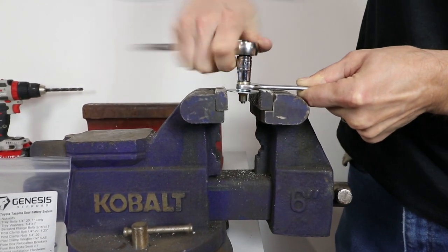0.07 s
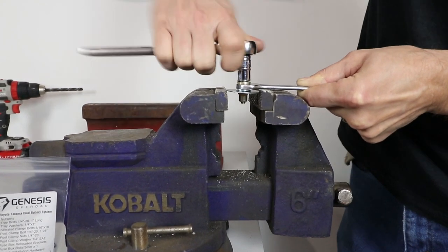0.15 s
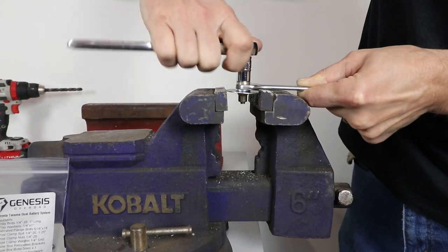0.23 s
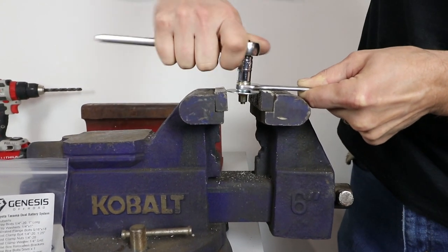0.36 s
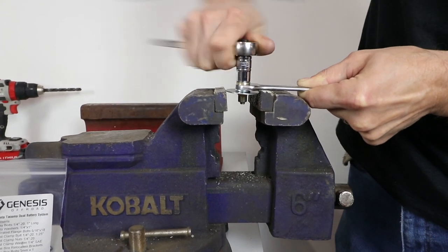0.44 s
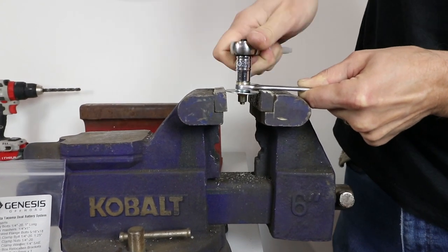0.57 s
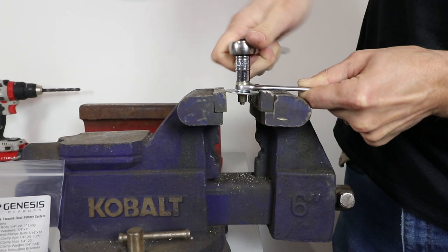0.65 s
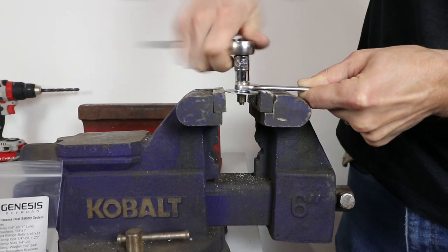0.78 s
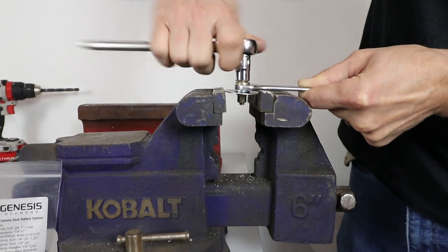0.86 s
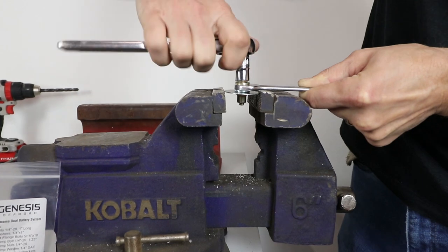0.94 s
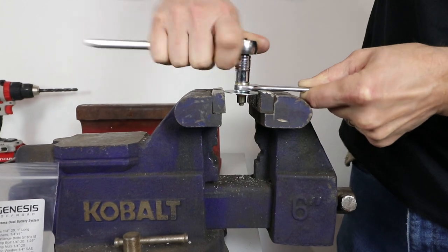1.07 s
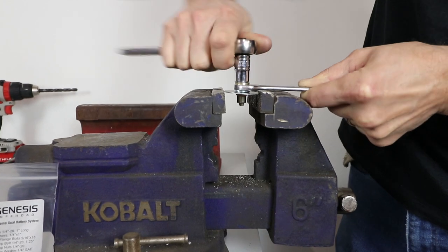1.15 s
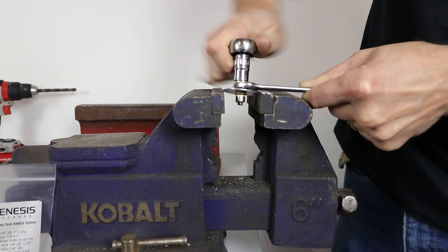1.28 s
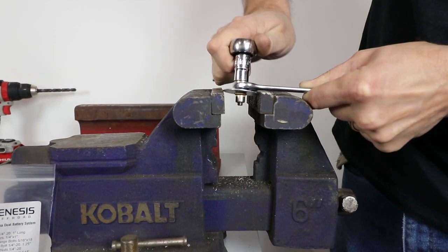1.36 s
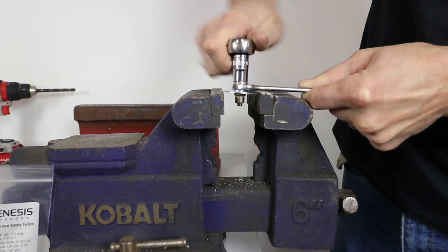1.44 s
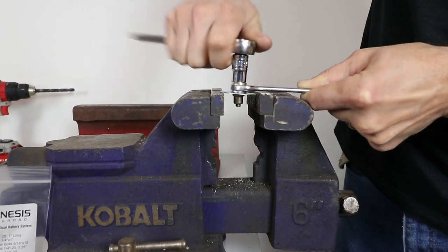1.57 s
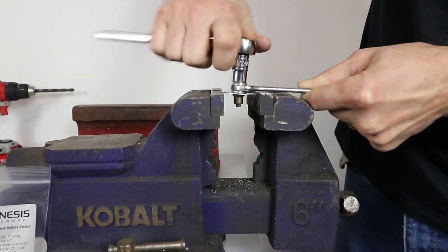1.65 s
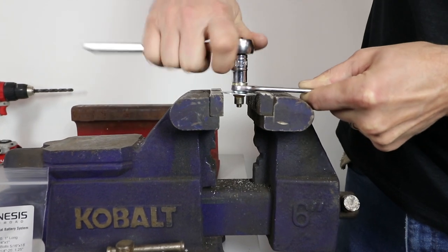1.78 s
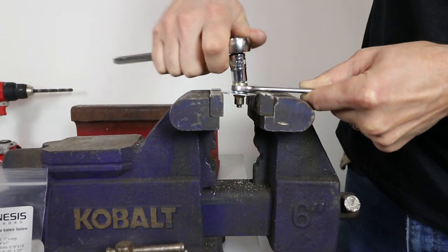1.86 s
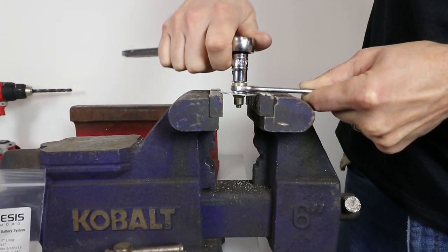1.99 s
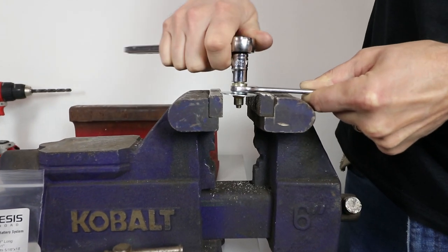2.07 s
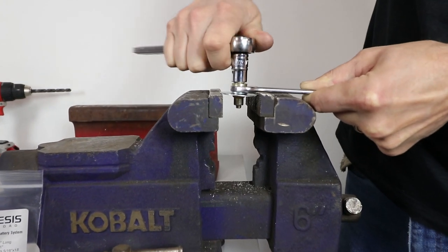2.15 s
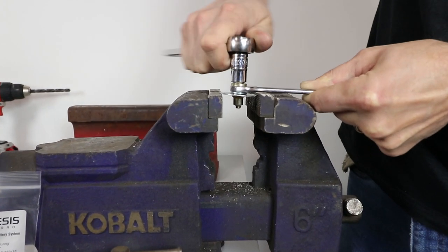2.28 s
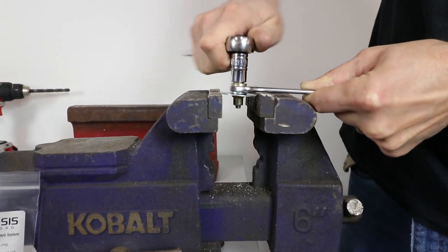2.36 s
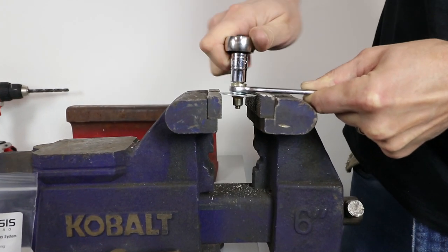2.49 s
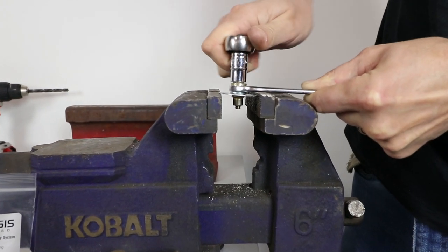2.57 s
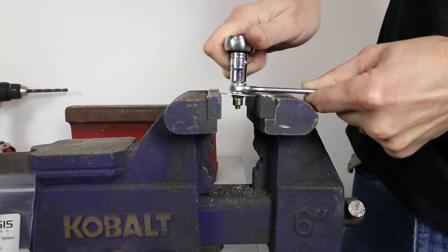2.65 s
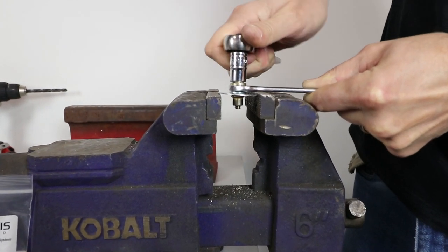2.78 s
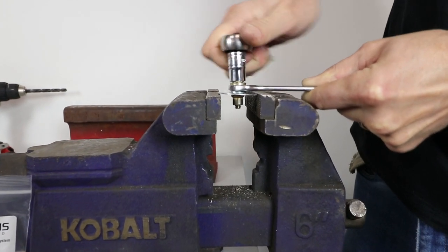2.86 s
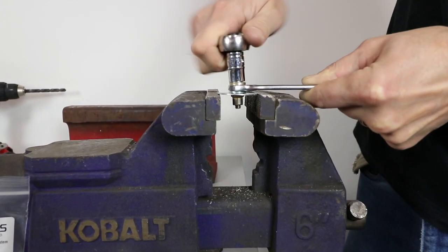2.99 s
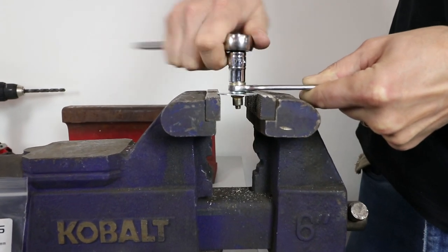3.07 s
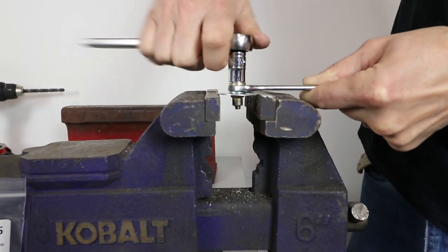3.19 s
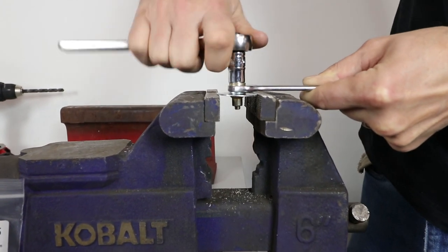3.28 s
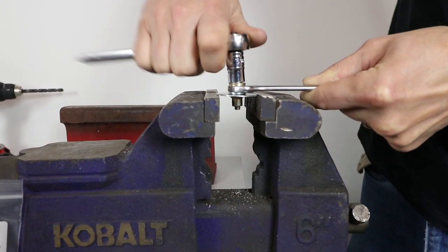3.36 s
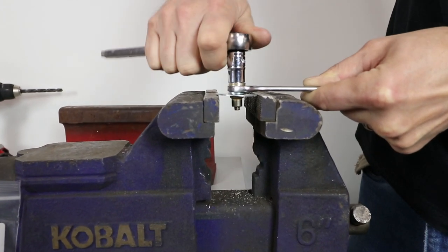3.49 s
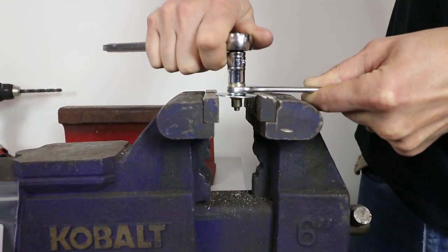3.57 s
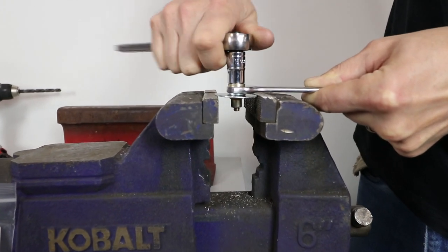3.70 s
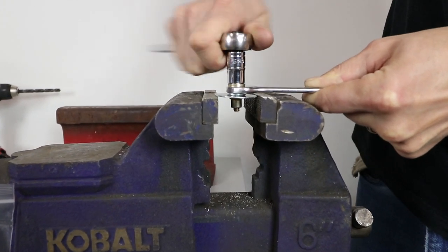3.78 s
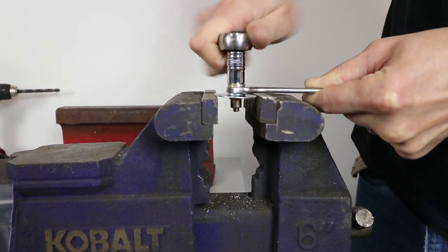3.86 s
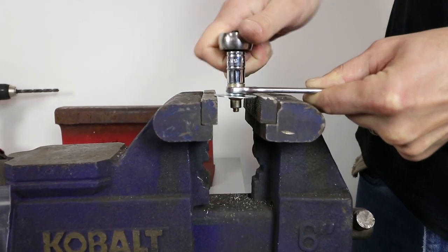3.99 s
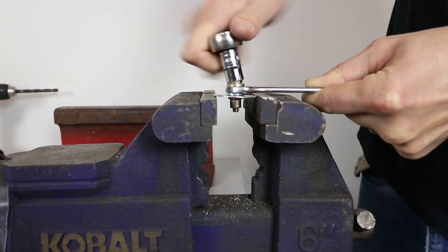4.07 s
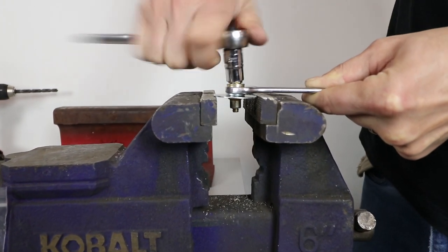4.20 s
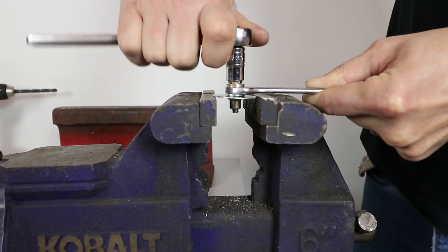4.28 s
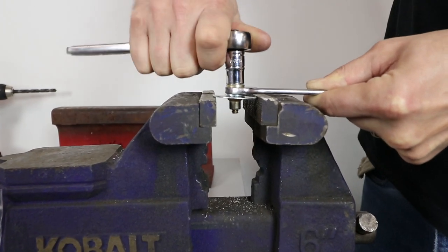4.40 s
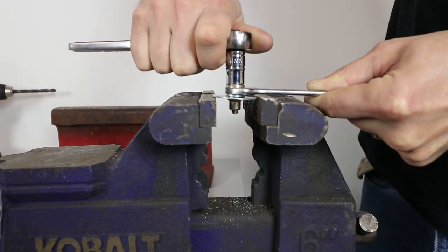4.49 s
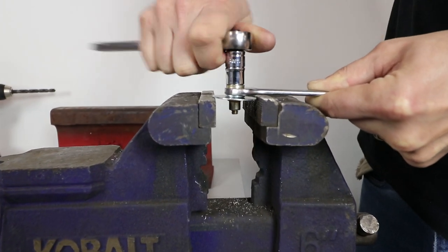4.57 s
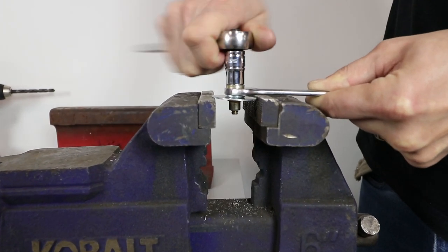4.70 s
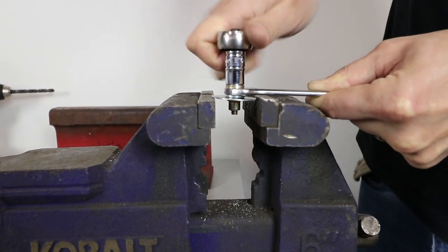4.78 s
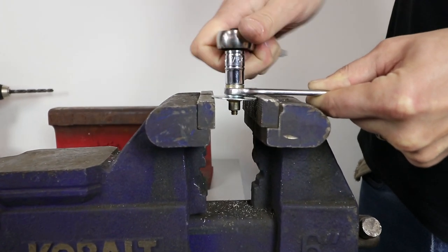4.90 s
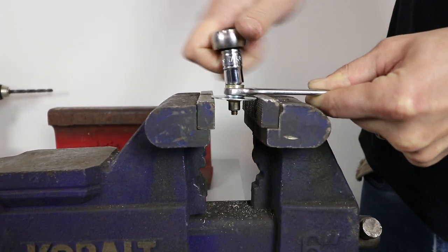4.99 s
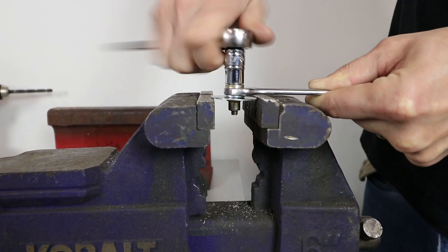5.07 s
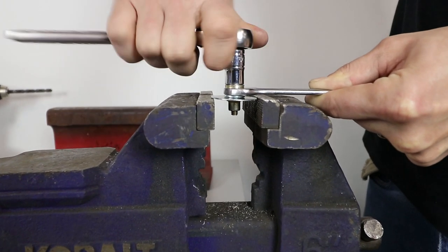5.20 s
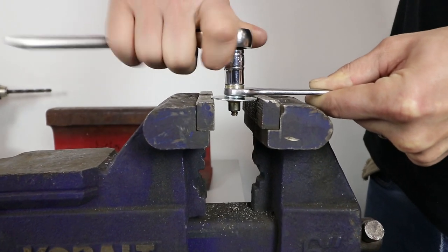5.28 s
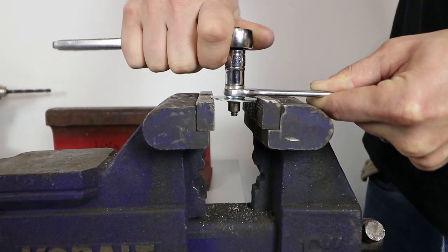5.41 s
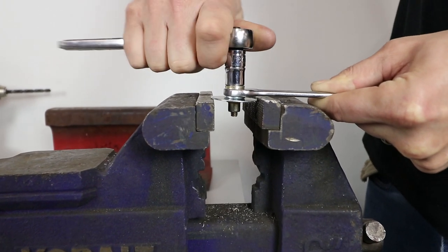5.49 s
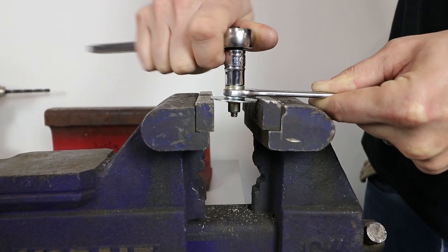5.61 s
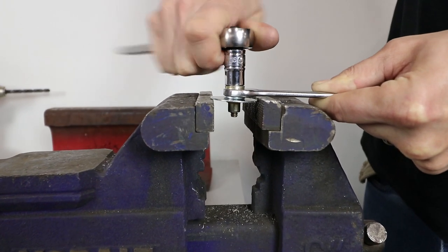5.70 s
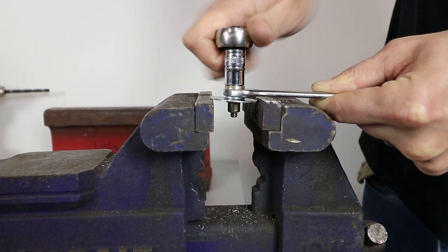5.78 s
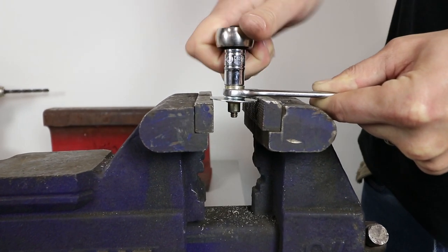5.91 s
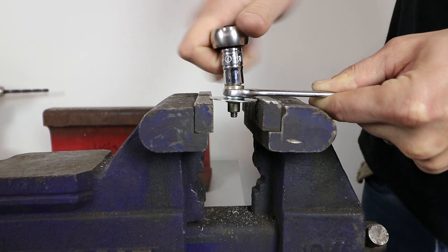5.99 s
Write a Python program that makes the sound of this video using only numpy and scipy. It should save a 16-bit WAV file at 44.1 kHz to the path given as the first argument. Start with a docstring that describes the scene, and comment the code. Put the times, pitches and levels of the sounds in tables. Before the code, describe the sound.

A socket ratchet clicks in short, close bursts while tightening a bolt in a vice, with a few metal knocks and dull thuds.

```python
"""Over the low hum of a quiet workshop, a socket ratchet clicks close to a single microphone.
It is swung to and fro on a bolt held in a bench vice. On the return the pawl snaps over the gear
teeth and sets the handle ringing; the socket knocks as play is taken up, the bench answers with
dull thuds, and the thread rubs under load. A faint treble shimmer comes and goes, a motor runs
far off, and the room gives each blow a short tail."""
import sys
import numpy as np
from scipy import signal
from scipy.fft import rfft, irfft, next_fast_len
from scipy.io import wavfile

SR = 44100
rng = np.random.default_rng(int(sys.argv[2]) if len(sys.argv) > 2 else 0)


def store_wav(level_fs):
    """Save 16-bit WAV to argv[1]."""
    pcm = np.round(np.clip(np.atleast_2d(level_fs), -1, 1) * 32767)
    wavfile.write(sys.argv[1], SR, pcm.T.astype(np.int16))


N = 266805

# The pawl landing on the teeth. Each row: start in seconds, nominal level in dB.
PAWL_CLICKS = [(.019, -49.5), (0.0312, -48), (0.048, -46.5), (.059, -31.5), (0.0705, -36), (0.074, -33),
               (0.0888, -32), (0.1038, -33), (0.12, -31), (0.1366, -32.5), (0.1534, -33), (0.1697, -35),
               (0.1874, -36), (0.215, -35), (0.193, -40), (0.241, -41), (0.3205, -48), (0.331, -43.5),
               (.746, -44.5), (0.7665, -47), (0.7757, -30.5), (0.7883, -31.5), (0.7889, -34.5),
               (0.8023, -31.5), (0.8163, -29), (0.8301, -32), (0.8437, -35), (.852, -35), (0.8592, -34.5),
               (0.8642, -33), (0.877, -37.5), (0.8944, -32), (0.9183, -30), (0.961, -31), (1.033, -42),
               (1.4773, -43.5), (1.509, -52), (1.529, -51.5), (1.5878, -29), (1.602, -48), (1.6295, -37),
               (1.6645, -31.5), (1.7021, -34), (1.8067, -46), (1.8133, -41), (1.834, -51), (1.8559, -41),
               (1.876, -49), (2.0538, -50), (2.106, -56.5), (2.9527, -46.5), (3.01, -30), (3.0491, -31.5),
               (3.0865, -34), (3.1292, -37), (3.1728, -33), (3.2147, -34), (3.2598, -33), (3.346, -55),
               (3.42, -52.5), (4.104, -48), (4.118, -45.5), (4.1524, -45), (4.1572, -35.5), (4.1769, -29.5),
               (4.1932, -31), (4.208, -31), (4.2128, -42.5), (4.2261, -28), (4.24, -28), (4.335, -53),
               (4.3653, -31), (5.031, -52), (5.037, -44.5), (5.044, -42.5), (5.063, -65), (5.0747, -31.5),
               (5.0933, -29), (5.1097, -30.5), (5.1258, -31.5), (5.142, -34), (5.159, -38), (5.1778, -39),
               (5.183, -37), (5.2012, -48), (5.242, -45.5), (5.337, -59), (5.3434, -46.5), (5.35, -45.5),
               (5.374, -41), (6.0164, -49.5), (6.029, -44)]
# The socket knocking on the bolt head as play is taken up.
# Each row: start in seconds, nominal level in dB, share of the socket and bolt modes in dB.
SLACK_KNOCKS = [(.344, -39.5, -1.5), (0.359, -45, 3.5), (1.0404, -34.5, -11), (1.284, -32, -4),
                (1.8734, -45, -2), (2.9176, -40, 2.5), (3.4033, -44.5, -9.5), (4.3681, -17, -6.5),
                (4.42, -41.5, 0), (5.322, -66, 9.5), (5.3642, -36, -12.5), (6.0365, -48.5, 5)]
# Modes of socket, bolt, head and pawl. Each row: pitch in Hz, relative level in dB, t60 in seconds.
STEEL_MODES = [(1315, -12, 0.066), (1629, -3, 0.018), (1995, -0.5, 0.018), (2660, 13.5, 0.0024),
               (3125, -7.5, 0.019), (3620, -8.5, 0.011), (4624, -8, 0.0067), (5390, 8, 0.0023),
               (5937, -2.5, 0.011), (6430, -3, 0.0071), (6915, 1.5, 0.0037), (7720, -5.5, 0.0037),
               (8940, -3.5, 0.0026), (9880, -2.5, 0.0038), (11100, -6.5, 0.0014), (12970, -27.5, 0.0026)]
# Long modes of the handle. Each row: pitch in Hz, level against a click in dB, t60 in seconds.
HANDLE_MODES = [(4965, -16, .032), (5925, -16, .035), (2310, -16, .06)]

USUAL_CLICK_DB = -35
DRAG_SAMPLES = 400   # the pawl drags this long before it lands


def from_db(db):
    """Decibels to gain."""
    return 10 ** (np.asarray(db) / 20)


def rms_one(x):
    """Scale to rms 1."""
    return x / np.sqrt(np.mean(x ** 2) + 1e-20)


def at_hz(points, hz):
    """Read a curve on a log-frequency axis."""
    point_hz, values = np.transpose(points)
    return np.interp(np.log(hz), np.log(point_hz), values)


def butter(x, order, hz, kind="low"):
    """Pass through a Butterworth filter."""
    return signal.sosfilt(signal.butter(order, hz, kind, fs=SR, output="sos"), x)


def ring(force, hz, t60):
    """One mode: a unit impulse starts a dying sine of height 1."""
    r, w = from_db(-60 / (t60 * SR)), 2 * np.pi * hz / SR
    return signal.lfilter([0, np.sin(w)], [1, -2 * r * np.cos(w), r * r], force + 1e-18)


def resonant_noise(hz, width_hz):
    """Noise through one resonance; rms 1."""
    return rms_one(ring(rng.standard_normal(N), hz, np.log(1000) / (np.pi * width_hz)))


def swell(start, end, level_db, fall_db_per_s, rise_db_per_s=161):
    """A gain that rises up to start, holds until end, then fades."""
    t = np.arange(N) / SR
    before, after = np.maximum(start - t, 0), np.maximum(t - end, 0)
    return from_db(level_db - rise_db_per_s * before - fall_db_per_s * after)


def strike(modes, force, length, scatter_db=4.5, detune=.006):
    """A blow drives each mode to its listed strength, with scatter; the energy is that of 1 ms at rms 1."""
    hz, mode_db, t60 = np.transpose(modes)[:, :, None]
    t, size = np.arange(length) / SR, next_fast_len(length + len(force))
    hz = hz * (1 + detune * rng.standard_normal(hz.shape))
    mode_db = mode_db + scatter_db * rng.standard_normal(hz.shape)
    sines = from_db(mode_db - 60 * t / t60) * np.sin(2 * np.pi * hz * t)
    free = rfft(sines * rng.choice([-1, 1], hz.shape), size)
    driven = free * rfft(force, size)
    driven *= np.linalg.norm(free, axis=1, keepdims=True) / np.linalg.norm(driven, axis=1, keepdims=True)
    blow = irfft(np.sum(driven, axis=0), size)[:length]
    return blow / np.linalg.norm(blow) * np.sqrt(SR / 1000)


def room_tone():
    """Steady low noise all round the microphone, and the wavering hum of a far motor."""
    # Spectrum of the room noise. Each row: frequency in Hz, relative level in dB.
    air_spectrum = [(20, -46.5), (35, -10), (55, 3), (140, -7.5), (300, -14), (790, -16.5), (2000, -30),
                    (3500, -32.5), (6300, -30), (10000, -40.5), (15400, -69)]
    # The motor's tones. Each row: pitch in Hz, level in dB.
    motor_tones = [(134, -77), (263, -78)]
    bin_hz = np.maximum(np.arange(N // 2 + 1) * SR / N, 1)
    air = irfft(rfft(rng.standard_normal(N)) * from_db(at_hz(air_spectrum, bin_hz)), N)
    hum = sum(from_db(db) * resonant_noise(hz, width_hz=1.5) for hz, db in motor_tones)
    return from_db(-68.5) * rms_one(air) + hum


def pawl_force(drag_ms=2.4, chatter_ms=0.57, rattle_ms=57):
    """The pawl drags over a tooth's crest, lands with a chatter, then rattles to rest."""
    ms = (np.arange(1400) - DRAG_SAMPLES) * 1000 / SR
    after = np.maximum(ms, 0)
    drag = from_db(-30) * np.exp(-np.abs(ms) / drag_ms) * (ms < 0)
    landing = (after / chatter_ms) ** 2 * np.exp(-after / chatter_ms)
    rattle = from_db(-37) * np.exp(-after / rattle_ms) * (ms >= 0)
    contacts = rng.standard_normal(len(ms)) ** 3   # cubed noise is spiky
    return contacts * (landing + drag + rattle)


def socket_share(start, level_db, seating_db_per_s=1.18, scatter_db=4):
    """Socket and bolt in a click, in dB: less in a sharp snap, more as the bolt draws tight."""
    share_db = np.clip(-14.5 - 0.31 * (level_db - USUAL_CLICK_DB), -15, 0)
    return share_db + scatter_db * rng.standard_normal() + seating_db_per_s * start


def ratchet(head_low_hz=4400, echo_db=-10.5, echo_t60=0.042):
    """At each click or knock, chattering contacts ring head, socket and pawl; quick echoes follow."""
    # The pawl's modes as the head turns. Each row: time in seconds, relative level in dB.
    facing = [(.9, -8), (1.3, -25), (1.6, -4.5), (2.9, -21), (3.2, -8), (4.2, -12), (4.37, -22), (5.1, -20)]
    length = 2600
    out, t = np.zeros(N + length), np.arange(length) / SR
    steel = np.array(STEEL_MODES)
    in_socket, in_pawl = steel[:, 0] < 4000, steel[:, 0] > 8500
    in_head = ~in_socket & ~in_pawl
    # A knock moves the whole tool and reaches lower than a click: gentler low cut, and less scatter.
    clicks = [(start, db, socket_share(start, db), 4, 4.5) for start, db in PAWL_CLICKS]
    knocks = [(start, db, socket_db, 1, 1.5) for start, db, socket_db in SLACK_KNOCKS]
    for start, level_db, socket_db, cut_order, scatter_db in clicks + knocks:
        force = pawl_force()
        echoes = rng.standard_normal(length) * from_db(-60 * t / echo_t60) * (t > .002)
        blunt_force = butter(force, 3, 9500)   # the heavy head is struck through a blunt contact
        head = strike(steel[in_head], blunt_force, length, scatter_db)
        head = butter(head, cut_order, head_low_hz, "high")
        socket = butter(strike(steel[in_socket], force, length), 2, 3600)
        pawl = strike(steel[in_pawl], force, length)
        dulling_db = 0.45 * min(level_db - USUAL_CLICK_DB, 0)   # soft clicks lose treble
        pawl_db = np.interp(start, *np.transpose(facing)) + dulling_db
        click = head + from_db(socket_db) * socket + from_db(pawl_db) * pawl
        click += from_db(echo_db) * signal.fftconvolve(click, echoes / np.linalg.norm(echoes))[:length]
        first = round(start * SR)
        out[first:first + length] += from_db(level_db) * click
    out = butter(out[DRAG_SAMPLES:N + DRAG_SAMPLES], 3, 13000)
    return butter(out, 3, 1100, "high")   # small parts radiate no bass


def handle(lag_s=0.0017, scatter_db=3.5, tighten_db_per_s=5):
    """Every click and knock rings the handle, as far as the grip allows; some clicks make it sing."""
    # Clicks that sing out. Each row: start in seconds, level of the 5 kHz and of the 6 kHz tone in dB.
    sings = [(.12, -57, -36), (0.8434, -38, -41), (.9183, -40, -36), (3.1299, -44, -62), (3.2594, -37, -35),
             (4.1933, -31.5, -51), (4.2261, -44, -47.5), (5.0744, -36.5, -59), (5.0928, -46, -51),
             (5.1261, -42, -29.5), (5.183, -60, -50)]
    sings = np.array(sings)
    starts, levels_db = np.transpose(PAWL_CLICKS + [row[:2] for row in SLACK_KNOCKS])
    scatter = scatter_db * rng.standard_normal((len(starts), len(HANDLE_MODES)))
    signs = rng.choice([-1, 1], scatter.shape)
    out = np.zeros(N)
    for k, (hz, mode_db, t60) in enumerate(HANDLE_MODES):
        lowest = k == 2   # this mode weakens as the bolt draws tight, and never sings
        drive_db = np.minimum(levels_db, USUAL_CLICK_DB) + mode_db + scatter[:, k]
        drive_db -= tighten_db_per_s * starts * lowest
        force = np.zeros(N + SR)
        force[((starts + lag_s) * SR).astype(int)] = signs[:, k] * from_db(drive_db)
        if not lowest:
            force[((sings[:, 0] + lag_s) * SR).astype(int)] = from_db(sings[:, 1 + k])
        out += butter(ring(force[:N], hz, t60), 1, [hz * .85, hz * 1.15], "band")
    return out


def gear_rasp_gain(rasp_db=-12, spread_s=0.015):
    """The gear rasps under the pawl, louder where the clicks crowd together."""
    t = np.arange(0, N, 64) / SR
    power = sum(from_db(2 * (min(db, USUAL_CLICK_DB) + rasp_db)) * np.exp(-np.abs(t - start) / spread_s)
                for start, db in PAWL_CLICKS)
    window_ms = 2000 * spread_s   # each click's 1 ms of power is spread to both sides
    return np.interp(np.arange(N) / SR, t, np.sqrt(power / window_ms))


def bench_thuds():
    """A rough, dying shove rings the vice and bench; a softer contact gives a duller thud."""
    # Each row: start in seconds, nominal level in dB, decay of the shove in ms, treble cutoff in Hz.
    thuds = [(0.06, -43, 110, 900), (0.354, -28, 32, 380), (0.601, -46.5, 51, 1620),
             (0.776, -32.5, 250, 815), (1.043, -36, 27, 565), (1.124, -36, 15, 275),
             (1.285, -25.5, 19.5, 6200), (1.289, -18, 31, 120), (1.484, -35, 40, 1630),
             (1.878, -38, 21, 970), (2.92, -40.5, 32, 1480), (3.427, -45, 18, 1260), (4.24, -35, 31, 1270),
             (4.37, -28.5, 43, 1220), (4.423, -41, 22, 700), (5.13, -39.5, 12, 1020),
             (5.376, -38.5, 23, 776)]
    # Modes of vice and bench. Each row: pitch in Hz, relative level in dB, t60 in seconds.
    bench_modes = [(97.6, -11.5, 0.18), (144.8, -11.5, 0.048), (216, -2.5, 0.12), (350, -4.5, 0.03),
                   (464, -6, 0.078), (646, -1, 0.044), (900, 10, 0.01), (1131, -1, 0.017), (1483, 8, 0.029),
                   (2140, -17, 0.026), (3250, -6, 0.029), (3540, -18, 0.09), (3660, -25, 0.28),
                   (4490, -0.5, 0.022)]
    length = 8000
    out, ms = np.zeros(N), np.arange(length) * 1000 / SR
    for start, level_db, decay_ms, cutoff_hz in thuds:
        shove = rng.standard_normal(length) * np.exp(-ms / decay_ms)
        thud = butter(strike(bench_modes, shove, length, scatter_db=2.5), 2, cutoff_hz)
        first = round(start * SR)
        out[first:first + length] += from_db(level_db) * thud
    return butter(out, 2, 70, "high")


def rubbing(rest_db=-80.5, flutter_db=0.5):
    """Thread, hand and gear rub in bolt and vice; the gear also rings the head; the grip flutters."""
    # Swings of the handle. Each row: start in seconds, end in seconds, level of the rubbing in dB.
    swings = [(0.583, 0.645, -73.5), (1.47, 1.527, -70), (2.804, 3.166, -66), (3.353, 3.413, -74.5),
              (3.72, 3.793, -75), (3.876, 4.16, -64.5), (4.266, 4.515, -70.5), (4.895, 5.15, -62),
              (5.87, 6.1, -69)]
    # Resonances of bolt and vice. Each row: centre in Hz, width in Hz, relative level in dB.
    rub_modes = [(560, 300, 0), (801, 130, 5), (1350, 200, 4.5), (1620, 300, -1), (2270, 460, -4.5),
                 (7660, 7700, -20.5)]
    flutter = rms_one(signal.lfilter([1], [1, -.995], rng.standard_normal(N)))
    body = sum(from_db(db) * resonant_noise(hz, width_hz) for hz, width_hz, db in rub_modes)
    body = rms_one(butter(body, 4, 9500))
    head = rms_one(sum(from_db(db) * resonant_noise(hz, np.log(1000) / (np.pi * t60))
                       for hz, db, t60 in STEEL_MODES[2:12] + HANDLE_MODES))
    swing_power = sum(swell(*swing, fall_db_per_s=62) ** 2 for swing in swings)
    rasp = gear_rasp_gain()
    friction = np.sqrt(from_db(2 * rest_db) + swing_power + rasp ** 2)
    return from_db(flutter_db * flutter) * (friction * body + from_db(-5) * rasp * head)


def steel_shimmer():
    """Faint noise in three high steel tones swells twice and fades; the gear's rasp stirs it too."""
    swells = swell(2.83, 3.3, -82, fall_db_per_s=72) + swell(5.376, 5.383, -85, fall_db_per_s=72)
    gain = swells + from_db(-17) * gear_rasp_gain()
    tones = sum(resonant_noise(hz, width_hz=290) for hz in (7400, 8300, 9300))
    return gain * rms_one(butter(tones, 4, [7000, 10500], "band"))


def workshop_tail(blows, level_db=-18, tilt_db_per_octave=-2.5, onset_s=0.0056):
    """The room returns the blows to the microphone as a diffuse tail that dies band by band."""
    # Decay of the room. Each row: frequency in Hz, t60 in seconds.
    room_t60 = [(300, 0.77), (1500, 0.29), (5000, 0.51), (10000, 0.33), (15000, 0.11)]
    t = np.arange(SR // 2) / SR
    tail, edges = 0, 60 * 2. ** np.arange(9)
    for low, high in zip(edges, edges[1:]):
        band = butter(rng.standard_normal(len(t)), 2, [low, high], "band")
        t60 = at_hz(room_t60, np.sqrt(low * high))
        band_db = tilt_db_per_octave * np.log2(low / 1000) - 60 * t / t60
        tail = tail + band * from_db(band_db) * np.minimum(t / onset_s, 1)
    return signal.fftconvolve(blows, from_db(level_db) * tail / np.linalg.norm(tail))[:N]


def scene():
    """In mono at the bench: the tool close by, the workshop behind it."""
    blows = ratchet() + handle() + bench_thuds()
    return (blows + workshop_tail(blows) + rubbing() + steel_shimmer() + room_tone())[None]


def record(dry):
    """A steep low-pass takes off the top, 70 dB down from 16.2 kHz."""
    return signal.sosfilt(signal.cheby2(12, 70, 16200, fs=SR, output="sos"), dry)


dry = scene()
out = record(dry)
store_wav(out)
```